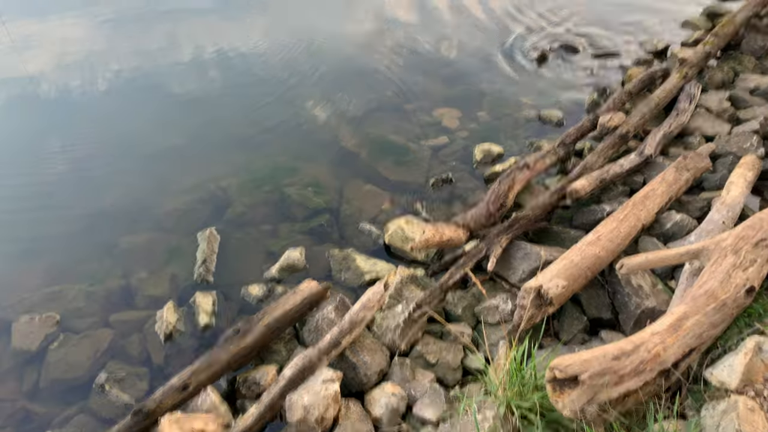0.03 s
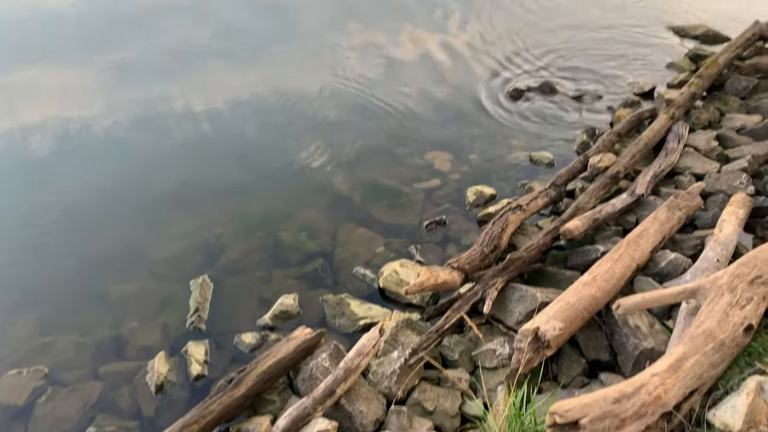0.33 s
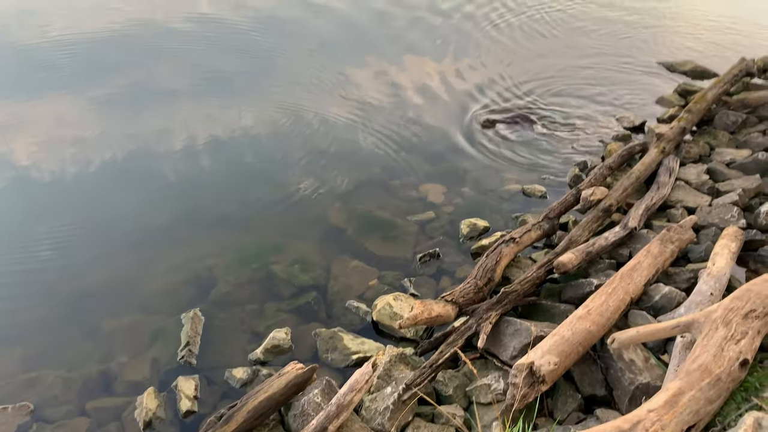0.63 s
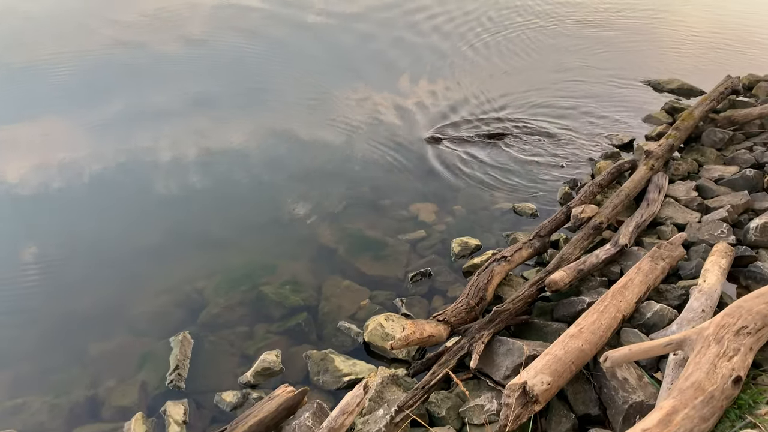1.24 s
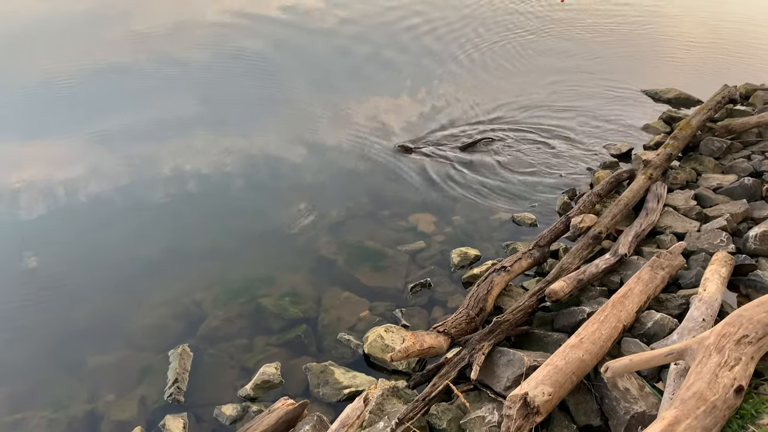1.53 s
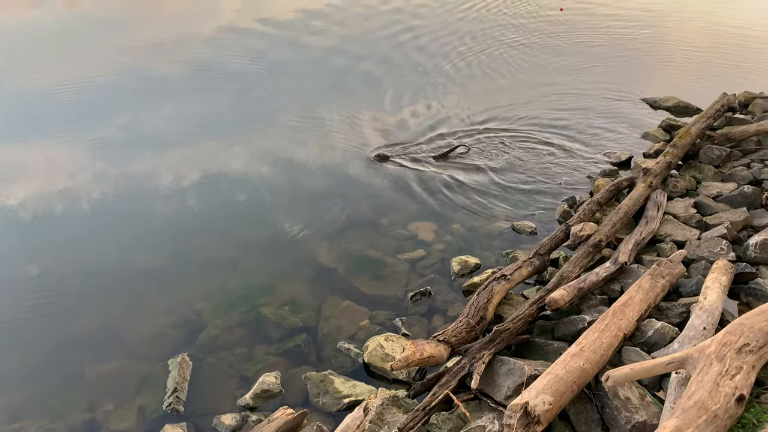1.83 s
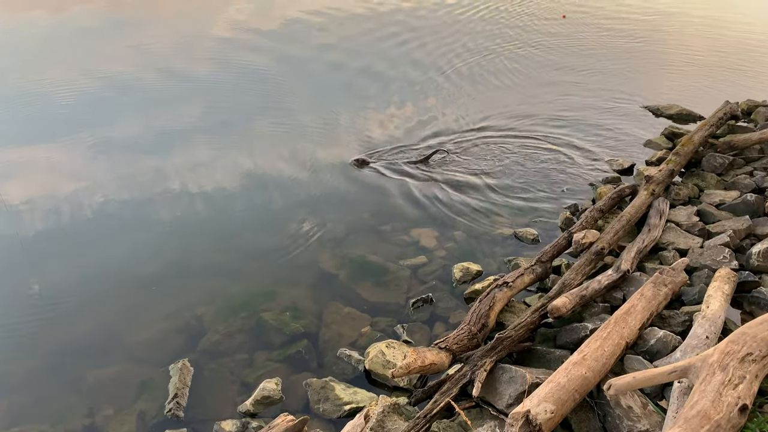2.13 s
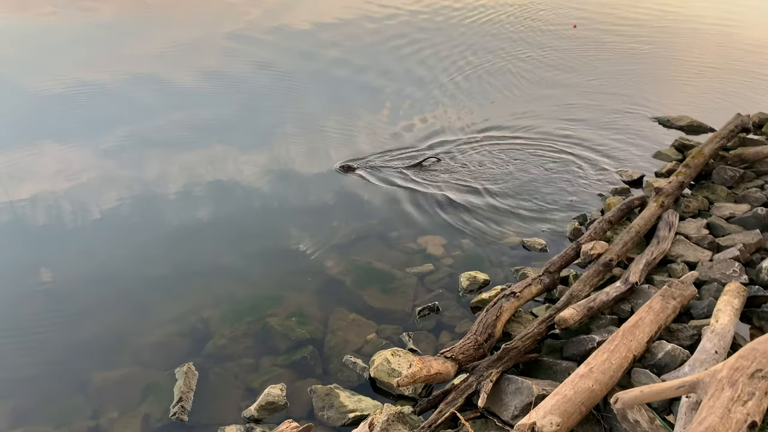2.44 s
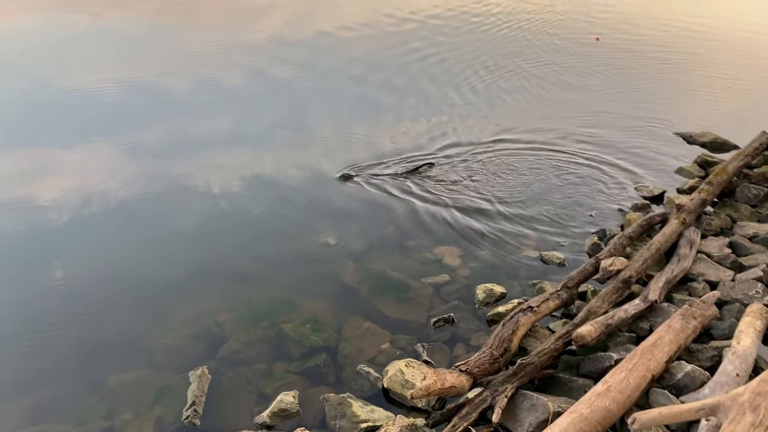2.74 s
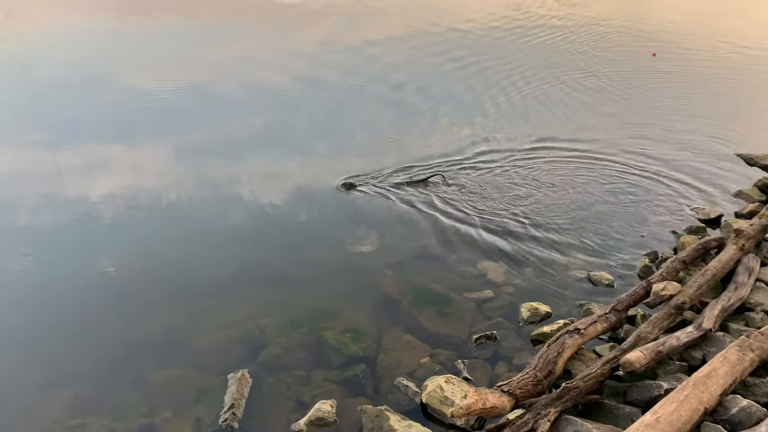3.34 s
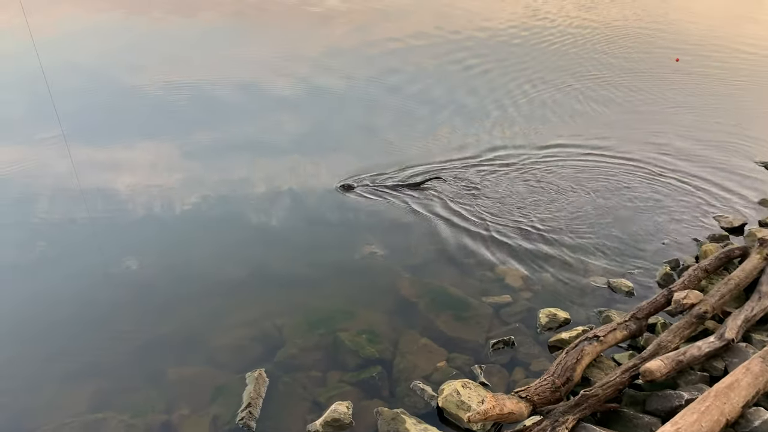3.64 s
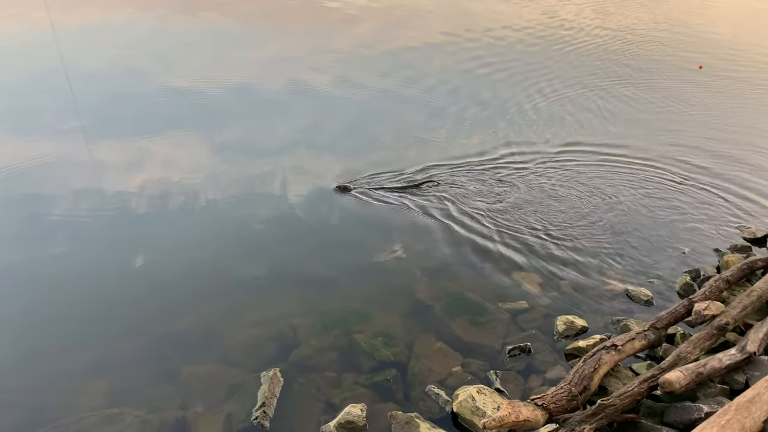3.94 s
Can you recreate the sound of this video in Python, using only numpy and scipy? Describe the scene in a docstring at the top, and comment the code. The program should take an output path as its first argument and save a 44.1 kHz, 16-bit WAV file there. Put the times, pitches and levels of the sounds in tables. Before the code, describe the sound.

A small bird chirps three times early on, each thin whistle dropping into a hoarse slur. The microphone, outdoors by calm water, also picks up a constant wind-like rumble, a fading far engine and faint distant birds.

```python
"""A small bird chirps three times on a calm riverbank, with softer nasal notes in between.
Each chirp is an arched whistle that plunges into a hoarse falling slur. The bird's throat shapes
its voice, and the stones and the bank echo it. Far off, other birds tick and twitter.
Under them lie a far engine whose hum sinks and fades, a low rumble, a soft roar and a faint hiss."""
import sys
import numpy as np
from scipy import signal
from scipy.fft import rfft, irfft
from scipy.io import wavfile
from scipy.ndimage import uniform_filter1d

SR = 44100
rng = np.random.default_rng(int(sys.argv[2]) if len(sys.argv) > 2 else 0)


def waveform_to_disk(signal):
    """Save audio, clipped to [-1, 1], as 16-bit WAV at the path in sys.argv[1]."""
    frames = np.transpose(np.atleast_2d(signal))
    scaled = np.clip(frames, -1, 1) * 32767
    samples = np.round(scaled).astype(np.int16)
    wavfile.write(sys.argv[1], SR, samples)


N = 176400  # 4 seconds

# The chirps. Each row: start in seconds, whistle length in seconds, top pitch in Hz, whistle level
# in dB, slur length in seconds, slur pitch in Hz, slur level in dB. Levels are before the throat.
CHIRP_CALLS = [(.857, .057, 4200, -61.5, .070, 1400, -69), (1.080, .039, 4630, -50.5, .082, 1480, -60.5),
               (1.399, .047, 4280, -55, .104, 1440, -64)]
# The whistle's arch. Each row: share of its length, share of the top pitch, level change in dB.
WHISTLE_SHAPE = [(0, .66, -9), (.2, .75, -7), (.36, .89, -9), (.48, .972, -1.5), (.7, 1, 0), (.9, .975, -1),
                 (1, .92, -12)]
# The slur's swell. Each row: share of its length, level change in dB.
SLUR_SHAPE = [(0, -7), (.15, -4), (.3, -1.5), (.5, 1), (.75, -1), (1, -7)]
# The soft notes. Each row: start in seconds, length in seconds, pitch in Hz, level in dB before
# the throat, change to the second harmonic in dB.
NASAL_NOTES = [(1.047, 0.049, 1386, -67, 11), (1.248, 0.076, 1445, -66.5, 11), (1.61, 0.058, 1382, -71, -6)]
# How the bird's throat colours its voice. Each row: frequency in Hz, gain in dB.
THROAT_GAIN = [(1300, -42), (2300, -25), (2850, -17), (3400, -14), (4100, -5.5), (4600, 0), (5100, -1),
               (5800, .5), (6400, -15), (7200, -23), (8400, -30), (9300, -31), (11000, -55)]
# Far birds' ticks. Each row: start in seconds, pitch in Hz, level before echo in dB, length in seconds.
FAR_TICKS = [(0.386, 7600, -99, 0.033), (0.665, 7860, -90.5, 0.023), (0.8, 8000, -85, 0.0099),
             (1.184, 8400, -86, 0.032), (1.262, 8300, -88, 0.04), (2.61, 8250, -85.5, 0.03),
             (3.441, 8380, -86.5, 0.028), (3.747, 8100, -93.5, .02)]
# The distant twitter. Each row: time in seconds, level in dB.
TWITTER_LEVEL = [(0, -110), (2, -105), (3, -100), (3.65, -99), (3.85, -95), (4, -100)]
# The engine's hum. Each row: time in seconds, pitch in Hz, level in dB.
ENGINE_HUM = [(.1, 269.6, -52.5), (.8, 271, -57), (1.4, 268.2, -61), (1.9, 265.2, -61.5), (2.3, 256.3, -65),
              (3.2, 258.4, -69.5), (4, 254, -73.5)]
# The colours of three background noises. Each row: frequency in Hz, relative strength in dB.
RUMBLE_COLOUR = [(13, -36.5), (22, -11.5), (70, 0), (85, -2), (108, -3), (141, -3.5), (230, -13),
                 (258, -13.5), (290, -16.5), (371, -24.5), (480, -32.5), (620, -48), (1060, -120)]
ROAR_COLOUR = [(300, -14.5), (480, -4), (640, -0.5), (780, -3), (1000, -13), (1300, -24), (1600, -31),
               (2200, -42)]
HISS_COLOUR = [(1060, -51), (1800, -6), (3230, -5), (3530, 0), (4330, -9), (4860, -6), (5360, 3.5),
               (6870, -11), (8350, -6), (8970, -14), (9370, -44), (9970, -12.5), (10800, -6), (12200, -10),
               (13200, -17), (14200, -10), (15000, -16)]
# How loud the rumble and the roar's upper edge are. Each row: time in seconds, level in dB.
RUMBLE_LEVEL = [(0, -43), (.7, -42.5), (1.3, -44), (2.2, -44), (2.8, -43), (4, -44)]
ROAR_EDGE_LEVEL = [(0, -88), (1.2, -86.5), (2.2, -80), (2.6, -79), (3.1, -77), (3.5, -83), (4, -83.5)]
# A sinking resonance in the roar. Each row: time in seconds, centre in Hz, level in dB.
ROAR_RESONANCE = [(0, 817.5, -69.5), (1.3, 728.3, -66), (2.4, 634.8, -65), (4, 630, -67)]
# How alike left and right noise are. Each row: frequency in Hz, likeness from 0 to 1.
STEREO_LIKENESS = [(60, 0.96), (150, 1), (280, 0.77), (600, 0.55), (1100, 0.1), (2000, 0), (4000, 0),
                   (14000, 0)]

PLUNGE_S, SLUR_SAG = .009, .25  # sag, droop, fall and jitter are shares of the pitch
BREAK_AFTER_S, BREAK_WIDTH_S, BREAK_RASP_DB = .011, .008, 12
WHISTLE_JITTER, JITTER_PER_DB, SLUR_JITTER, BREAK_JITTER = .002, .003, .018, .11
NOTE_SAG, NOTE_DROOP, NOTE_JITTER = .16, .065, .013
TICK_FALL, TICK_JITTER, TICK_ECHO_DB = .056, .022, 8.5
JITTER_HZ, FLUTTER_HZ, FLUTTER_DB, HOARSE_DB = 900, 130, 3.5, -9.5
STONES_DB, BANK_DB, BANK_DELAY_S = -4.5, -13.5, .04
THROB_HZ, THROB_DB = 82, -56.5
ROAR_DB, ROAR_PAN_DB, HISS_DB = -60.5, 2.5, -81.5  # the roar leans to the right
BIRD_LAG_S, DISTANT_LAG_S, HISS_LAG_S = -.00045, -.00024, .0001868  # how late the right side is
START_S, TOP_HZ = .083, 15200


def chirps(t):
    """One glide each: a pure whistle arches, breaks into a rasp as it plunges, and sags on hoarsely."""
    out = np.zeros(N)
    for start, whistle_s, top_hz, whistle_db, slur_s, slur_hz, slur_db in CHIRP_CALLS:
        arch, effort_db = curve((t - start) / whistle_s, WHISTLE_SHAPE)
        since = np.clip(t - start - whistle_s, 0, slur_s)
        progress = since / slur_s
        slur = 1 - np.exp(-since / PLUNGE_S)  # 0 in the whistle, near 1 after the plunge
        whistle = 1 - slur
        voice_break = (since > 0) * np.exp(-.5 * ((since - BREAK_AFTER_S) / BREAK_WIDTH_S) ** 2)
        hz = whistle * top_hz * arch + slur * slur_hz * (1 - SLUR_SAG * (progress - .5))
        jitter = whistle * (WHISTLE_JITTER - JITTER_PER_DB * effort_db)  # shakier when quieter
        jitter += slur * SLUR_JITTER + voice_break * BREAK_JITTER
        hz *= 1 + jitter * wander(JITTER_HZ)
        db = whistle * (whistle_db + effort_db) + slur * (slur_db + curve(progress, SLUR_SHAPE)[0])
        sound = voice(hz, rough=slur, rasp_db=voice_break * BREAK_RASP_DB)
        out += gate((t - start) / (whistle_s + slur_s)) * gain(db) * sound
    return out


def soft_notes(t):
    """Short, hoarse nasal notes from the same throat: the pitch arches a little and droops."""
    out = np.zeros(N)
    for start, length, hz, db, second_db in NASAL_NOTES:
        progress = np.clip((t - start) / length, 0, 1)
        arch = 1 - NOTE_SAG * abs(2 * progress - 1) ** 3
        pitch = hz * (arch - NOTE_DROOP * (progress - .5) + NOTE_JITTER * wander(JITTER_HZ))
        out += gate(progress, edge=.28) * gain(db) * voice(pitch, rough=1, second_db=second_db)
    return out


def voice(hz, rough, second_db=0, rasp_db=0):
    """The throat shapes six harmonics (multiples of the pitch). When rough, they flutter and air hisses."""
    phase = phase_of(hz)
    out = rough * gain(HOARSE_DB + rasp_db) * stereo_noise(THROAT_GAIN)[0]
    for k in range(1, 7):
        flutter_db = rough * FLUTTER_DB * wander(FLUTTER_HZ)
        db = curve(k * hz, THROAT_GAIN)[0] + flutter_db + second_db * (k == 2)
        out += (k * hz < TOP_HZ) * gain(db) * tone(k * phase)
    return out


def riverbank_echoes(t, bird):
    """The stones throw the bird's sound back at once, the bank later and for longer."""
    late = np.interp(t - BANK_DELAY_S, t, bird)
    return gain(STONES_DB) * echo(bird, fade_s=.11) + gain(BANK_DB) * echo(late, fade_s=.55)


def far_ticks(t):
    """Far birds give very high, slightly falling calls, half lost in their echo."""
    out = np.zeros(N)
    for start, hz, db, length in FAR_TICKS:
        progress = np.clip((t - start) / length, 0, 1)
        pitch = hz * (1 - TICK_FALL * (progress - .5) + TICK_JITTER * wander(JITTER_HZ))
        out += gain(db) * gate(progress, edge=.15) * tone(phase_of(pitch))
    return out + gain(TICK_ECHO_DB) * echo(out, fade_s=.3)


def twitter(t):
    """Very distant birds blur into a narrow band of flickering noise."""
    calls = noise_band(hz=3560, width_hz=410) * gain(curve(t, TWITTER_LEVEL)[0] + 3 * wander(40))
    return echo(calls, fade_s=.23)


def engine(t):
    """A far engine: a wavering hum that sinks and fades, over a low throb."""
    hz, db = curve(t, ENGINE_HUM)
    hum = gain(db + 3 * wander(4.5)) * tone(phase_of(hz * (1 + .012 * wander(13))))
    throb_gain = gain(THROB_DB + 2.5 * wander(3.45))
    throb = throb_gain * tone(phase_of(THROB_HZ * (1 + .019 * wander(11))))
    return ears(hum + throb, DISTANT_LAG_S) + gain(-14.5) * echo(hum, fade_s=.51)


def rumble(t):
    """Low, distant noise whose level drifts a little."""
    noise = stereo_noise(RUMBLE_COLOUR, DISTANT_LAG_S)
    return noise * gain(curve(t, RUMBLE_LEVEL)[0] + .31 * wander(7.6))


def roar(t):
    """The soft roar of distance, with a slowly sinking resonance and an upper edge that swells."""
    hz, db = curve(t, ROAR_RESONANCE)
    phase = phase_of(hz)
    resonance = gain(db) * (wander(220) * np.sin(phase) + wander(220) * np.cos(phase))
    body = stereo_noise(ROAR_COLOUR, DISTANT_LAG_S) * gain(ROAR_DB + .5 * wander(4.3))
    pan = gain([[-ROAR_PAN_DB / 2], [ROAR_PAN_DB / 2]])
    edge = np.array([noise_band(hz=1225, width_hz=170) for _ in range(2)])
    return (body + resonance) * pan + edge * gain(curve(t, ROAR_EDGE_LEVEL)[0])


def hiss():
    """Faint, steady, high noise."""
    return stereo_noise(HISS_COLOUR, HISS_LAG_S) * gain(HISS_DB)


def gain(db):
    """Turn decibels into a number to multiply by."""
    return 10 ** (np.asarray(db) / 20)


def normalise(x):
    """Scale a sound to an average strength (rms) of 1."""
    return x / np.sqrt(np.mean(x ** 2))


def wander(rate_hz):
    """A smooth random wobble with a typical size of 1."""
    hold = max(int(SR / rate_hz), 1)
    steps = np.repeat(rng.standard_normal(N // hold + 1), hold)
    return 1.351 * uniform_filter1d(uniform_filter1d(steps, hold), hold)[:N]


def curve(x, table):
    """Look up x in a table's first column and read the others, sliding between rows."""
    first, *others = np.array(table, float).T
    return [np.interp(x, first, column) for column in others]


def over_hz(table):
    """Spread a table of frequencies and values over every frequency in the sound."""
    hz, value = np.array(table, float).T
    return np.interp(np.log(np.fft.rfftfreq(N, 1 / SR) + 1), np.log(hz), value)


def phase_of(hz):
    """The angle a wave of this pitch has turned through so far."""
    return 2 * np.pi * np.cumsum(hz) / SR


def tone(phase):
    """A sine wave with an average strength of 1."""
    return np.sqrt(2) * np.sin(phase)


def gate(progress, edge=.08):
    """Let sound through while progress runs from 0 to 1, fading in and out."""
    return np.sin(np.pi / 2 * np.clip(np.minimum(progress, 1 - progress) / edge, 0, 1)) ** 2


def noise_band(hz, width_hz):
    """Noise that stays close to one frequency."""
    f = np.fft.rfftfreq(N, 1 / SR) + 1
    off_centre = (f * f - hz * hz) / (f * width_hz)
    return normalise(irfft(rfft(rng.standard_normal(N)) / (1 + off_centre ** 2), N))


def stereo_noise(colour, lag_s=0):
    """Noise shaped by a colour table, dying away beyond its ends; the right side may lag."""
    f = np.fft.rfftfreq(N, 1 / SR) + 1
    alike = np.clip(over_hz(STEREO_LIKENESS), -.99, .99)
    mid, side = rfft(rng.standard_normal((2, N))) * np.sqrt([1 + alike, 1 - alike])
    ends = np.minimum(1, np.minimum(f / colour[0][0], colour[-1][0] / f)) ** 6
    pair = np.array([mid + side, (mid - side) * np.exp(-2j * np.pi * f * lag_s)])
    return normalise(irfft(pair * ends * gain(over_hz(colour)), N))


def echo(x, fade_s):
    """A wash of echoes, different on each side, that drops 60 dB in fade_s seconds."""
    t = np.arange(SR) / SR
    tails = rng.standard_normal((2, SR)) * np.exp(-np.log(1000) * t / fade_s)
    return np.array([signal.fftconvolve(x, tail / np.linalg.norm(tail))[:N] for tail in tails])


def ears(x, lag_s):
    """One sound at both ears: the right hears it late, or early if the lag is negative."""
    delay = np.exp(-2j * np.pi * np.fft.rfftfreq(N, 1 / SR) * lag_s)
    return np.array([x, irfft(rfft(x) * delay, N)])


def scene():
    """The near bird and its echoes, over everything distant."""
    t = np.arange(N) / SR
    bird = chirps(t) + soft_notes(t)
    near = ears(bird, BIRD_LAG_S) + riverbank_echoes(t, bird)
    return near + far_ticks(t) + twitter(t) + engine(t) + rumble(t) + roar(t) + hiss()


def record(dry):
    """The microphone opens just after the start and cuts the highest treble."""
    opened = np.clip((np.arange(N) / SR - START_S) / .003, 0, 1)
    treble_cut = signal.ellip(8, .2, 70, TOP_HZ, fs=SR, output="sos")
    return signal.sosfilt(treble_cut, dry * opened)


dry = scene()
out = record(dry)
waveform_to_disk(out)
```